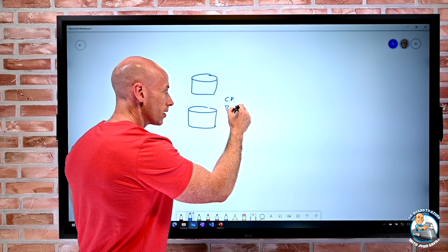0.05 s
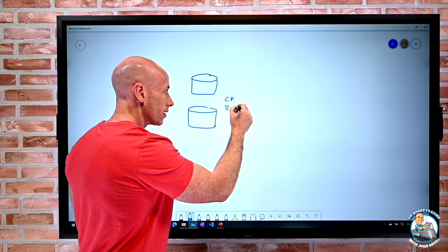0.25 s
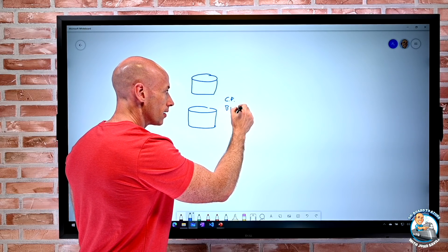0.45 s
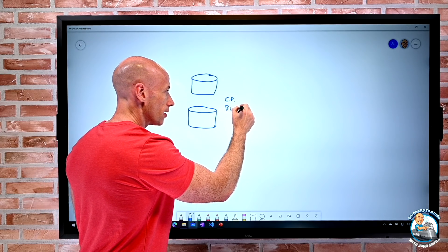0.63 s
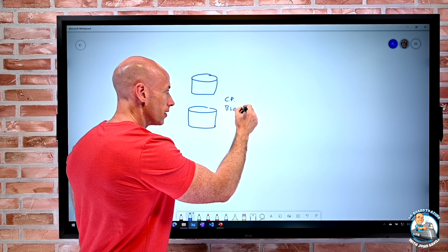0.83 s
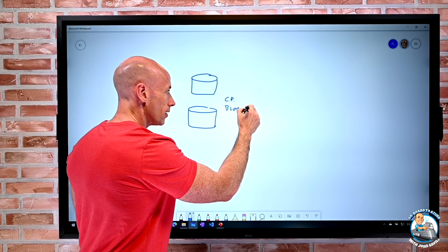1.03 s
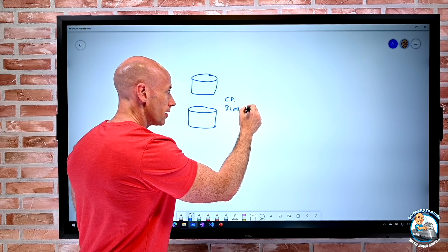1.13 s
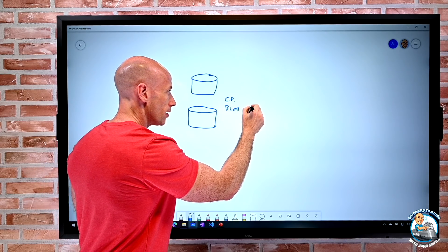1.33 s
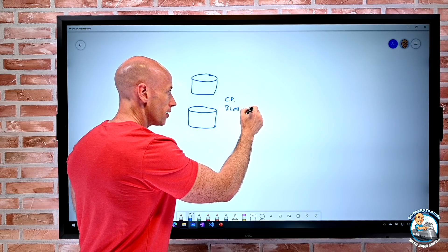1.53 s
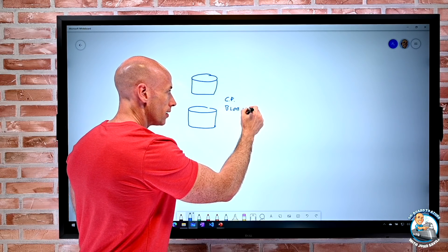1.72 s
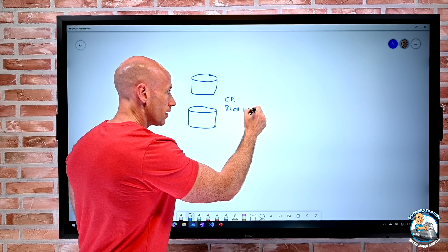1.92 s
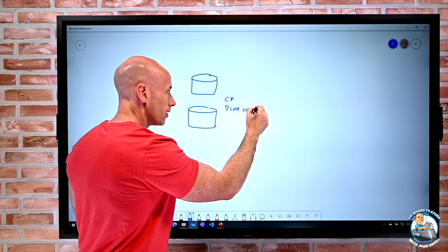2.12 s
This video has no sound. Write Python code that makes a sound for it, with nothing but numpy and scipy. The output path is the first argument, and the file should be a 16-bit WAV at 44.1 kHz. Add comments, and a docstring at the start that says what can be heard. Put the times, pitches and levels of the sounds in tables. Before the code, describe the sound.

Handwriting taps of a plastic pen tip on a glass touchscreen: one at the start, a pause, another, a longer pause, then a louder one and three quicker, heard close indoors over faint buzz and low air rumble.

```python
"""Stylus taps on a glass wall screen

A stylus tip taps the glass of a large wall screen in a small damped room, heard close by a clip-on
microphone on the writer's chest. Each tap is one pressure cycle that flutters in the gap behind the
glass; its push rings the panel as decaying sines and the room as decaying band noise, and the hard
tip snaps and hisses. A scrape and a low boom die away at the start. Beneath lie mains buzz from
switching edges with a wavering hum, a low air rumble and faint hiss, both shaped noise."""
import sys
import numpy as np
from scipy import signal
from scipy.fft import rfft, irfft
from scipy.io import wavfile

SR = 44100
rng = np.random.default_rng(int(sys.argv[2]) if len(sys.argv) > 2 else 0)


def wrap_up_sound(samples):
    """Save the sound to the file named by the first command line argument, as 16-bit audio."""
    columns = np.atleast_2d(samples).T
    # keep every value between -1 and 1, then stretch to whole-number steps
    tamed = np.clip(columns, -1, 1)
    steps = np.round(tamed * 32767).astype(np.int16)
    wavfile.write(sys.argv[1], SR, steps)


def boost_factor(decibels):
    """Convert a level in decibels to a linear amplitude factor."""
    exponent = np.asarray(decibels, float) / 20
    return 10 ** exponent


N = 95564  # samples
TAP_SIZE = SR // 2  # samples computed for each tap

# Stylus strokes landing on the glass. Each row: start in seconds, level in dB, contact time in ms,
# level of the tick in dB against the tap, place along the written line (about -1 to 1).
TAPS = [(0.0307, -25, 1.39, 0.5, -1.15), (0.3882, -26.5, 1.4, 3, -1.05), (1.0403, -21.5, 1.285, 3.5, 0.052),
        (1.408, -25.5, 1.367, 1.5, 0.65), (1.7813, -24.5, 1.35, -0.5, 0.37), (1.988, -26, 1.37, 3, 0.87)]
# Light touches of the tip, with the same columns.
TOUCHES = [(0.0203, -46, .6, 14, -1)]


def taps():
    """Each contact adds its pressure flutter, the panel and room set off by its push, and a tick."""
    t = np.arange(TAP_SIZE) / SR
    modes = panel_modes()
    tail = room_tail()
    out = np.zeros(N + 2 * TAP_SIZE)
    for start, db, contact_ms, tick_db, place in TAPS + TOUCHES:
        contact = np.minimum(t / (contact_ms / 1000), 1)  # runs from 0 to 1 during contact
        push = np.sin(np.pi * contact[:100]) ** 2
        body = panel_gains(place) @ modes + tail
        body = body * np.exp(-(t / 0.18) ** 4)  # the resting tip and hand damp the late tail
        pushed_body = np.convolve(body, push / push.sum())[:TAP_SIZE]
        tap = gap_flutter(contact) + pushed_body + boost_factor(tick_db) * tip_tick()
        first = int(start * SR)
        out[first:first + TAP_SIZE] += boost_factor(db) * tap
    return highpass(out[:N], 70.5)


def gap_flutter(contact):
    """A pressure cycle circulates between glass and back plate, weaker and duller at each return."""
    gap_s, feedback, dullness = 0.00227, 0.59, 0.63
    direct_db, bounce_db = 1, -10  # whole flutter; extra strength of the first return
    delay = round(gap_s * SR)
    loop = np.zeros(delay + 1)
    loop[0], loop[1], loop[-1] = 1, -dullness, -feedback * (1 - dullness)
    cycle = -np.sin(2 * np.pi * contact) * np.sin(np.pi * contact)
    flutter = signal.lfilter([1, -dullness], loop, cycle)
    until_second_return = np.arange(TAP_SIZE) / SR < 2 * gap_s
    bounce = boost_factor(bounce_db) * np.roll(flutter, delay) * until_second_return
    return boost_factor(direct_db) * (flutter + bounce)


# Ringing modes of the glass panel. Each row: frequency in Hz, level in dB before the panel's overall
# gain, t60 in seconds, change in dB per unit of place.
PANEL = [(143.5, -11.5, 0.2, 0), (257, -9.5, 0.33, 0), (288.2, -13, 0.29, 0), (330.5, -6, 0.29, 4),
         (393, -9, 0.26, -2.5), (434.7, -4.5, 0.2, 2.5), (459.9, 0.5, .2, 1.5), (488.4, 6.5, 0.11, -4.5),
         (532.4, -14.5, 0.07, 2), (705, -1.5, 0.13, 2), (768.7, -1, 0.091, 6), (807.3, -3, 0.23, 2),
         (863, -13.5, 0.12, 2.5), (935, -15.5, 0.33, 1), (1217, -0.5, 0.16, 0), (1336, -35, 0.063, -1.5)]


def panel_modes():
    """Each panel mode is a decaying sine that swells in quickly; neighbours start in opposite sign."""
    t = np.arange(TAP_SIZE) / SR
    modes = np.array([(-1) ** k * ring([mode[:3]], TAP_SIZE) for k, mode in enumerate(PANEL)])
    return modes * (1 - np.exp(-t / 0.0017))


def panel_gains(place):
    """The place of the tap along the line sets how strongly each mode is driven."""
    panel_db = -12
    return boost_factor(panel_db + place * np.array(PANEL)[:, -1])


# Tail of the small room by band. Each row: centre in Hz, level in dB, t60 in seconds.
ROOM = [(140, -30.5, .33), (223, -29.5, 0.42), (432, -16, 0.43), (740, -19, 0.26), (1230, -1.5, 0.13),
        (1800, -42.5, 0.096)]


def room_tail():
    """The room answers with band noise that rises over some 7 ms and decays band by band."""
    t = np.arange(TAP_SIZE) / SR
    return bands(ROOM, TAP_SIZE) * (1 - np.exp(-t / 0.007))


# Hiss of the hard tip and its tail, by band. Each row: centre in Hz, level in dB, t60 in seconds.
TIP = [(1880, -40.5, 0.17), (2530, -47.5, 0.1), (3670, -38, 0.16), (4050, -58, 0.058), (5800, -53, 0.15),
       (7660, -60, 0.092), (11300, -62, 0.065)]
# The snap of contact, by band. Each row: centre in Hz, level in dB, t60 in seconds.
CRACK = [(1930, -30, .02), (2800, -36.5, 0.016), (3565, -26.5, 0.019), (4560, -37.5, 0.017),
         (5900, -41, 0.0083), (8160, -42, 0.015), (12000, -49, 0.014)]


def tip_tick():
    """Snap and hiss are decaying band noise; a short ring returns late off a near surface."""
    echo_s, echo_hz, echo_db, echo_t60_s = 0.0066, 3260, -24.5, 0.012
    t = np.arange(TAP_SIZE) / SR
    fade_in = np.minimum(t * echo_hz / 2, 1)  # over two cycles
    echo = ring([(echo_hz, echo_db, echo_t60_s)], TAP_SIZE) * fade_in
    return bands(TIP, TAP_SIZE) + bands(CRACK, TAP_SIZE) + np.roll(echo, int(echo_s * SR))


def late_side_copy(knocks):
    """A faint late, treble-heavy (differentiated) copy, to be added with opposite sign left and right."""
    copy_db, delay_s = -14.5, 0.007
    return boost_factor(copy_db) * np.gradient(np.roll(knocks, int(delay_s * SR)))


# The tip sliding off an earlier stroke. Each row: centre in Hz, level in dB, t60 in seconds.
SCRAPE = [(1190, -73, 0.45), (1970, -70, 0.24), (3820, -70, 0.11)]


def scrape():
    """Friction of the sliding tip as band noise dying away from the start."""
    return bands(SCRAPE, N)


# A low boom at the start. Each row: frequency in Hz, level in dB, t60 in seconds.
BOOM = [(157.3, -61.5, 0.79), (207, -45, 0.13), (280, -66, 0.42)]


def boom():
    """Low decaying sines that die away from the start."""
    return ring(BOOM, N)


# Switching edges in each mains half cycle. Each row: position as a share of the half cycle, signed
# weight, level in dB before the high-pass, rise in ms, fall in ms, ringing in dB against the edge.
EDGES = [(0, 0.95, -57, 0.052, 0.69, -10.5), (0.234, -1.7, -69, 0.21, 0.62, -48),
         (0.639, -0.81, -61, 0.033, 0.041, -18.5)]


def buzz():
    """Mains pickup: switching edges that ring and fall, flipped each half cycle, over a wavering hum."""
    mains_hz, mains_start_s = 60.025, 0.62707
    ring_hz, ring_ms = 3320, 0.33
    hum_db, third_db = -74.5, -72  # fundamental and third harmonic
    beat_depth, beat_hz, beat_top_s = 0.38, 1.15, 0.69
    t = np.arange(N) / SR
    half_cycles = 2 * mains_hz * (t - mains_start_s)
    edges = np.zeros(N)
    for share, weight, db, rise_ms, fall_ms, ring_db in EDGES:
        for back in (0, 1):  # the latest edge and the end of the one before
            k = np.floor(half_cycles - share) - back
            ms = (half_cycles - share - k) / (2 * mains_hz) * 1000  # time since that edge
            pulse = (1 - np.exp(-ms / rise_ms)) * np.exp(-ms / fall_ms)
            ringing = np.sin(2 * np.pi * ring_hz * ms / 1000) * np.exp(-ms / ring_ms)
            edges += weight * (-1) ** k * boost_factor(db) * (pulse + boost_factor(ring_db) * ringing)
    beat = 1 + beat_depth * np.cos(2 * np.pi * beat_hz * (t - beat_top_s))
    hum = -boost_factor(hum_db) * np.sin(np.pi * half_cycles) * beat
    third = boost_factor(third_db) * np.sin(3 * np.pi * half_cycles)
    return highpass(edges, 310) + hum + third


# Spectrum of the air rumble. Each row: frequency in Hz, relative level in dB per Hz.
AIR = [(20, -16), (45, -20), (110, -0.5), (180, -4.5), (300, -10.5), (600, -15.5), (1200, -23.5),
       (3400, -27.5), (8000, -31.5), (15500, -34)]


def air_rumble():
    """Steady noise, strongest in the low octaves, equal left and right."""
    return coloured(AIR, -72.5, N)


# Spectrum of the side hiss. Each row: frequency in Hz, relative level in dB per Hz.
SIDE_HISS = [(59, -43.5), (100, -6.5), (438, -5.5), (1280, -14), (1400, -15), (2860, -5.5), (15500, -12.5)]


def side_hiss():
    """Faint steady noise, to be added with opposite sign left and right."""
    return coloured(SIDE_HISS, -90.3, N)


def ring(modes, size):
    """Sum of decaying sines."""
    t = np.arange(size) / SR
    return sum(boost_factor(db) * np.sin(2 * np.pi * hz * t) * 1000. ** (-t / t60) for hz, db, t60 in modes)


def bands(table, size):
    """Band noise that decays at each band's own rate from its starting rms level."""
    t = np.arange(size) / SR
    out = np.zeros(size)
    for hz, db, t60 in table:
        band_filter = signal.butter(2, [hz / 1.25, hz * 1.099], "band", fs=SR, output="sos")
        band = signal.sosfilt(band_filter, rng.standard_normal(size))
        out += boost_factor(db) * band / band.std() * 1000. ** (-t / t60)
    return out


def coloured(points, db, size):
    """Noise with a spectrum drawn through the points, at an rms level in dB."""
    hz, point_db = np.transpose(np.array(points, float))
    f = np.fft.rfftfreq(size, 1 / SR) + 1  # 1 Hz up, to keep the logarithm finite
    shape = boost_factor(np.interp(np.log(f), np.log(hz), point_db))
    noise = irfft(rfft(rng.standard_normal(size)) * shape, size)
    return noise * boost_factor(db) / noise.std()


def highpass(x, cut_hz):
    """Fourth-order high-pass."""
    return signal.sosfilt(signal.butter(4, cut_hz, "high", fs=SR, output="sos"), x)


def scene():
    """Nearly the same left and right, but for faint hiss and a faint late copy of the taps."""
    knocks = taps()
    mid = knocks + scrape() + boom() + buzz() + air_rumble()
    side = late_side_copy(knocks) + side_hiss()
    return mid + side * np.array([[1], [-1]])


def top_cut(x):
    """Nothing passes above the cut-off."""
    return signal.sosfilt(signal.butter(12, 15620, fs=SR, output="sos"), x)


def record(dry):
    """Takes the stereo mix at the chest microphone as it stands."""
    return top_cut(dry)


dry = scene()
out = record(dry)
wrap_up_sound(out)
```